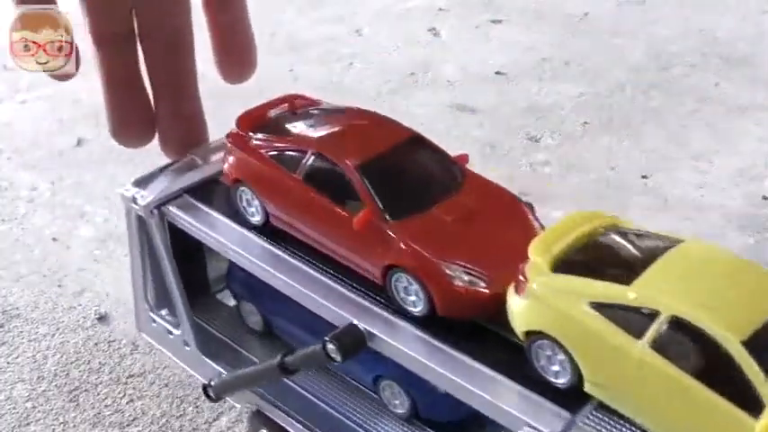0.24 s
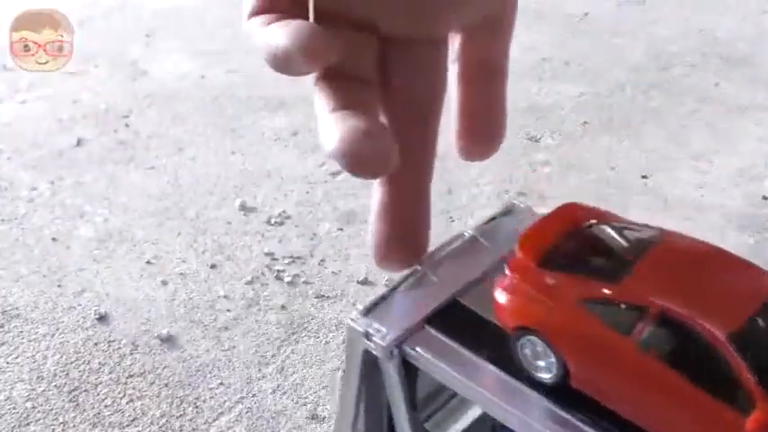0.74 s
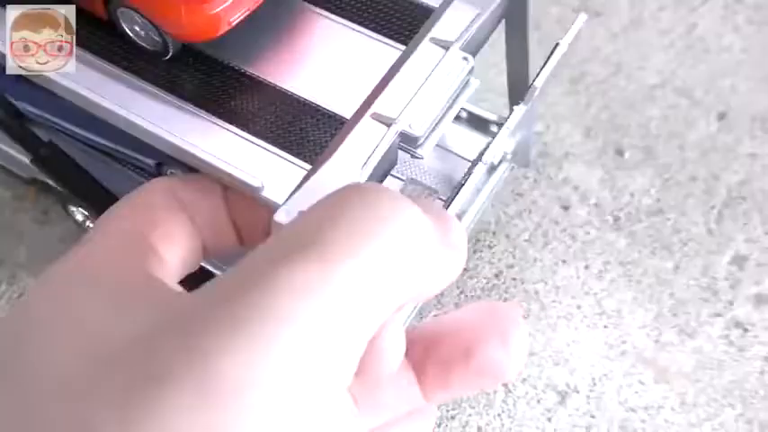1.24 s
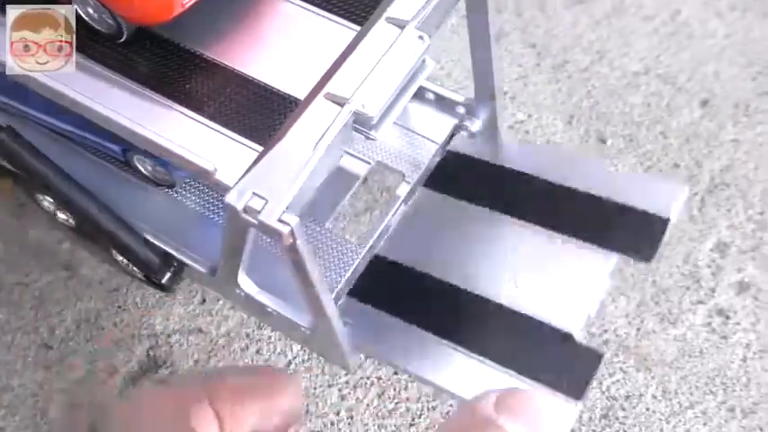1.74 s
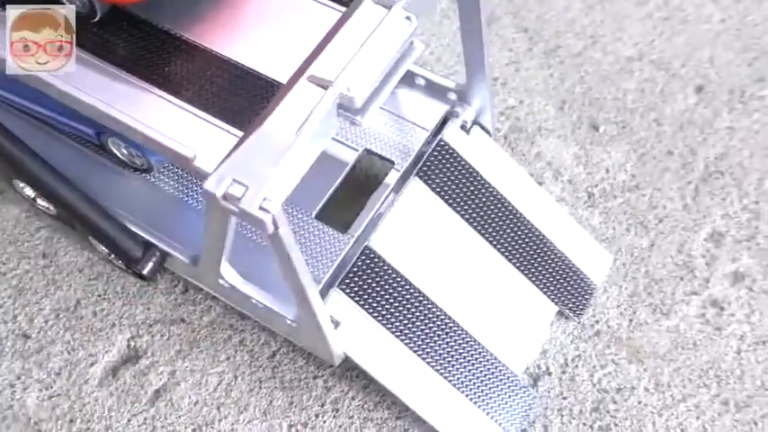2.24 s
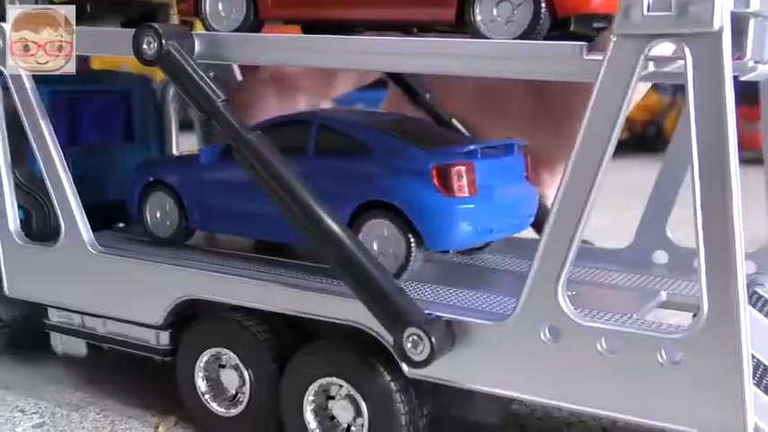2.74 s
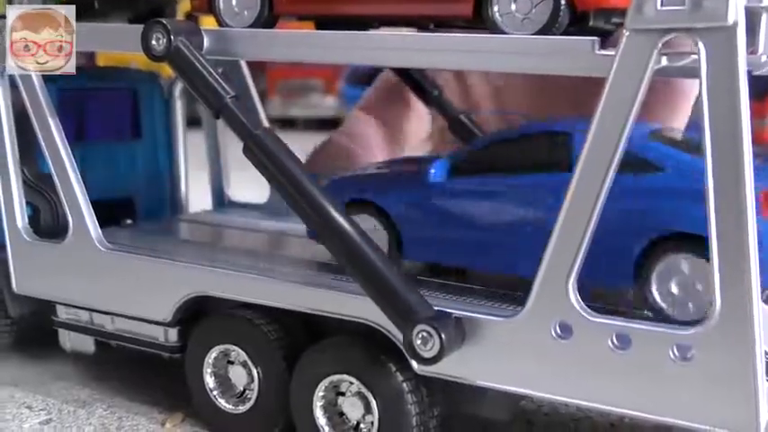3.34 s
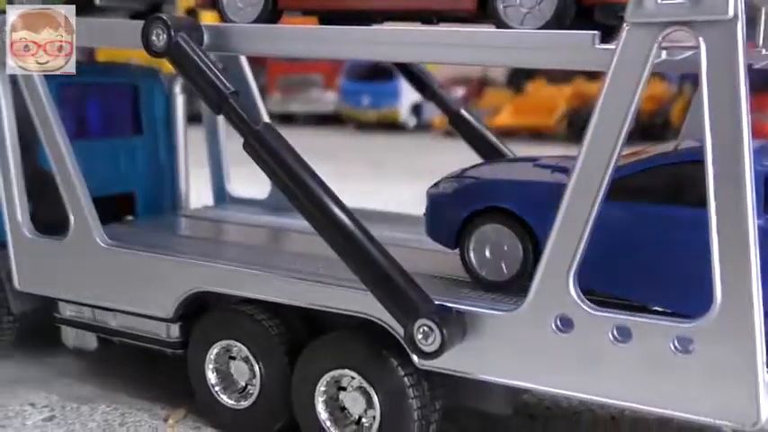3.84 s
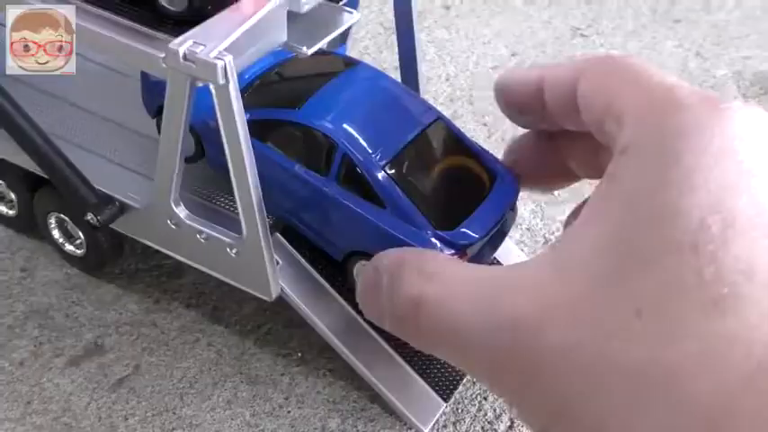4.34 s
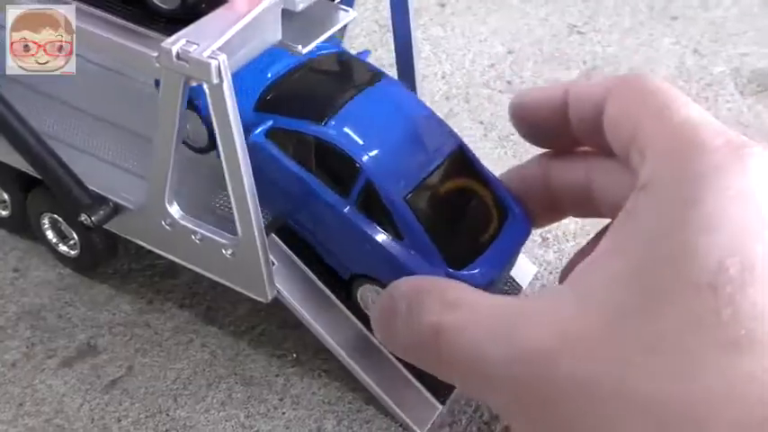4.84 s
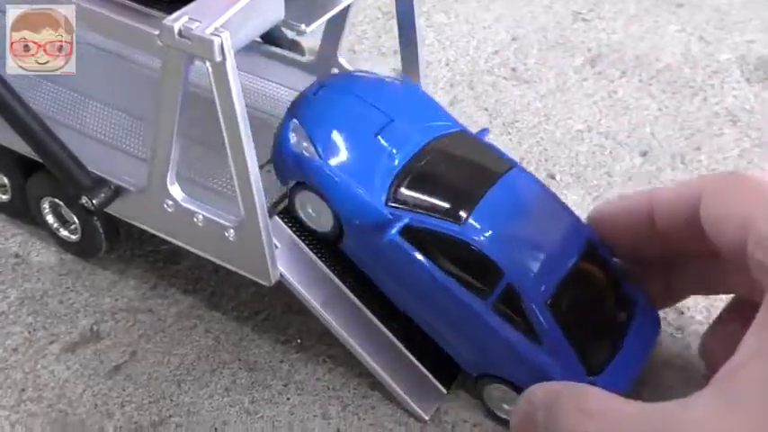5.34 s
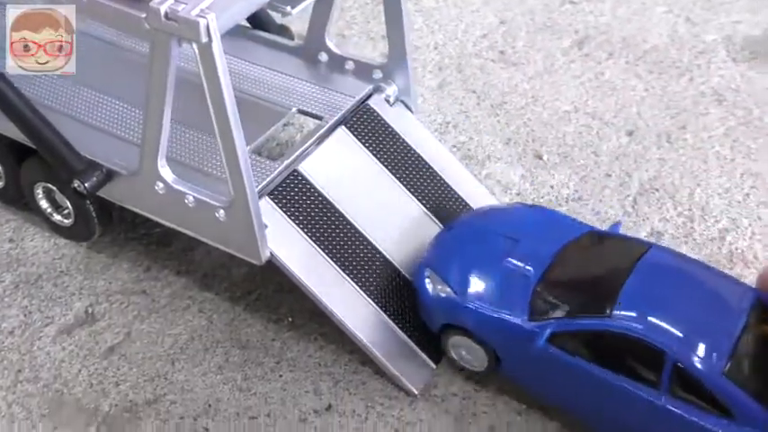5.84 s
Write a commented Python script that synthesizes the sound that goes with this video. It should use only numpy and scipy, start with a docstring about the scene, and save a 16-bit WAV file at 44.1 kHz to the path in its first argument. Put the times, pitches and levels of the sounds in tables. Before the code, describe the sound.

Four abruptly joined close shots of plastic toys on concrete: steady hollow grinding of wheels on grit; a hard unlatching snap, then a ramp dropping with a bright clack and shrinking bounces; a car whirring with dry rapid ticks along a hollow deck, knocking; finally slower ticks, bumps and gritty rolling down the ramp. Faint hiss and short room reflections.

```python
"""Plastic toy vehicles on gritty concrete, close to a small stereo microphone, in four joined shots.
A transporter rolls off; its ramp is unlatched, drops and bounces; a car is pushed along the deck and down the ramp.
Random grit grains ring hollow-shell resonances and crackle; short noise bursts make knocks, bounces and pawl ticks.
Decaying noise makes a small hard room; shaped noise and a narrow band make faint hiss and hum."""
import sys
import numpy as np
from scipy import signal
from scipy.fft import rfft, irfft
from scipy.io import wavfile
from scipy.ndimage import uniform_filter1d

SR = 44100
rng = np.random.default_rng(int(sys.argv[2]) if len(sys.argv) > 2 else 0)


def invert_db(level):
    """Linear amplitude ratio for a level in decibels (20 dB per decade), elementwise."""
    return 10 ** (np.asarray(level, dtype=float) / 20)


def to_wav(s):
    """Save 16-bit WAV."""
    ch = np.atleast_2d(s).T  # columns
    pcm = np.round(np.clip(ch, -1, 1) * 32767)  # PCM
    wavfile.write(sys.argv[1], SR, pcm.astype(np.int16))


N = 268569
TIME = np.arange(N) / SR
LEFT_RIGHT = np.array([[1], [-1]])


def unit(x):
    """Scale to rms 1."""
    return x / np.sqrt(np.mean(x ** 2))


def ring(x, hz, width_hz):
    """One resonance, gain 1 at its centre."""
    return signal.lfilter(*signal.iirpeak(hz, hz / width_hz, SR), x)


def mode_rings(x, modes):
    """Each resonance of a set, neighbours in opposite phase so the valleys stay filled."""
    return np.array([(-1) ** k * invert_db(db) * ring(x, hz, width_hz) for k, (hz, width_hz, db) in enumerate(modes)])


def shell(x, modes):
    """A set of resonances, summed."""
    return mode_rings(x, modes).sum(axis=0)


def steep(x, hz, kind):
    """Fourth-order high- or low-pass."""
    return signal.sosfilt(signal.butter(4, hz, kind, fs=SR, output="sos"), x)


def wander(cutoff_hz):
    """Slow random drift, rms 1."""
    return unit(signal.sosfilt(signal.butter(2, cutoff_hz, fs=SR, output="sos"), rng.standard_normal(N)))


def contact(noise, decay_ms, rise_ms=0.27):
    """A burst of tiny collisions that swells quickly and dies away."""
    t_ms = np.arange(noise.shape[-1]) * 1000 / SR
    return noise * (1 - np.exp(-t_ms / rise_ms)) * np.exp(-t_ms / decay_ms)


def between(table):
    """A level curve as gain, silent outside its span."""
    s, db = np.transpose(table)
    return invert_db(np.interp(TIME, s, db)) * (TIME >= s[0]) * (TIME <= s[-1])


# shot starts: t/s
CUTS_S = [0, 1.09, 2.33, 4.425]


def shot_end(s):
    """The next cut after a moment."""
    return min(cut for cut in CUTS_S + [np.inf] if cut > s)


def grit(grains_per_s, spread_db, decay_ms):
    """Grains crushed at random moments, few large and many small, each a short scrape."""
    struck = rng.random(N) < grains_per_s / SR
    sizes = struck * invert_db(spread_db * np.minimum(rng.exponential(size=N), 3))
    scrape = signal.lfilter([1], [1, -np.exp(-1000 / (decay_ms * SR))], sizes)
    return unit(scrape * rng.standard_normal(N))


# treble resonances of crushed grit: f/Hz, width/Hz, gain/dB
GRIT_MODES = [(4940, 1530, 9.4), (7050, 11500, 1.8), (9700, 2070, 5.33), (12160, 760, 2.5),
              (12500, 2500, 2.3)]
SHIFT_RMS_DB, SHIFT_CUTOFF_HZ = 1.2, 20


def rolling(body_gain, fine_gain, modes, grains_per_s, spread_db, decay_ms):
    """The same grains shake the shell, their power passing from panel to panel, and crackle in the treble."""
    grains = grit(grains_per_s, spread_db, decay_ms)
    rings = mode_rings(grains, modes)
    power = np.mean(rings ** 2, axis=1)
    shares = invert_db(SHIFT_RMS_DB * np.array([wander(SHIFT_CUTOFF_HZ) for _ in modes]))
    panels = np.sum(shares * rings, axis=0) / np.sqrt(power @ shares ** 2)  # steady total power
    body = unit(steep(panels, 290, "high"))
    fine = unit(steep(shell(grains, GRIT_MODES), 6300, "high"))
    return body * body_gain + fine * fine_gain


# transporter wheels on grit: t/s, shell level/dB
TRUCK_ROLL = [(0, -27), (.07, -35.5), (.4, -33.5), (.42, -29.5), (.55, -34), (.955, -32), (.97, -31.5),
              (1.09, -30)]
# hollow transporter shell: f/Hz, width/Hz, gain/dB
TRUCK_SHELL = [(303, 18, -9), (503, 200, -12.5), (859, 63, -0.5), (1107, 94, 3), (1640, 580, -2),
               (2490, 540, -2.5), (3380, 540, -3.5), (4460, 1960, -13)]
TRUCK_FINE_DB = -30.5  # crackle re shell


def transporter():
    """Wheels crush grit, which shakes the hollow transporter shell."""
    gain = between(TRUCK_ROLL)
    return rolling(gain, gain * invert_db(TRUCK_FINE_DB), TRUCK_SHELL, 2000, 1.0, 3.7)


# short drags of fingers, latch and wheels: start t/s, hold/s, shell level/dB, crackle re shell/dB
SCRAPES = [(1.091, 0.14, -42, -42), (1.28, 0.91, -60, -13.5), (1.89, 0.079, -48, -29),
           (2.854, 0.015, -33.5, -23), (3.2, 0.023, -32.5, -23), (3.403, 0.023, -37, -22),
           (3.613, .17, -32, -18.5), (3.779, 0.076, -43, -39), (3.909, 0.13, -59, -2.5),
           (4.228, 0.02, -44, -22), (4.25, 0.076, -33.5, -16.5), (4.36, .095, -43, -37)]
SCRAPE_ATTACK_S, SCRAPE_RELEASE_DB_PER_S = 0.0022, 311


def scrape_powers():
    """Shell and crackle powers of the drags: quick onset, hold, then a fade linear in dB."""
    body, fine = np.zeros(N), np.zeros(N)
    for s, hold_s, db, fine_db in SCRAPES:
        fade_db = SCRAPE_RELEASE_DB_PER_S * np.maximum(TIME - s - hold_s, 0)
        attack = np.clip((TIME - s) / SCRAPE_ATTACK_S, 0, 1)
        gain = attack * invert_db(db - fade_db) * (TIME < shot_end(s))
        body += gain ** 2
        fine += (gain * invert_db(fine_db)) ** 2
    return body, fine


# gear position on the deck, also ticked by pawl(): t/s, teeth passed
DECK_GEAR = [(2.627, 0), (2.689, 3), (2.745, 5), (2.823, 6), (2.87, 7), (2.919, 9), (2.951, 11),
             (2.973, 13), (3.014, 18), (3.106, 27), (3.172, 31), (3.251, 40), (3.283, 43), (3.356, 48),
             (3.416, 54), (3.463, 60), (3.522, 66), (3.616, 74)]
# car let down the ramp and onto the ground: t/s, shell level/dB
RAMP_ROLL = [(4.874, -46.5), (5.05, -45.5), (5.15, -38), (5.26, -37.5), (5.39, -45), (5.415, -28),
             (5.45, -43), (5.63, -41), (5.8, -35), (6.09, -32.5)]
DECK_DB, DECK_TEETH_PER_S, DB_PER_DOUBLING = -36.5, 105, 11  # level at this speed, louder when faster
SPEED_SMOOTH_S = 0.0068
CAR_FINE_DB = -19  # ramp-roll crackle re shell


def car_levels():
    """Shell and crackle gains: deck roll from gear speed, ramp roll and scrapes, summed as powers."""
    teeth_per_s = np.gradient(np.interp(TIME, *np.transpose(DECK_GEAR))) * SR
    teeth_per_s = uniform_filter1d(teeth_per_s, int(SPEED_SMOOTH_S * SR)).clip(1e-3)
    deck = invert_db(DECK_DB + DB_PER_DOUBLING * np.log2(teeth_per_s / DECK_TEETH_PER_S))
    ramp = between(RAMP_ROLL)
    scrape_body, scrape_fine = scrape_powers()
    body = deck ** 2 + ramp ** 2 + scrape_body
    fine = (ramp * invert_db(CAR_FINE_DB)) ** 2 + scrape_fine
    return np.sqrt(body), np.sqrt(fine)


# car standing on the hollow deck: f/Hz, width/Hz, gain/dB
DECK_SHELL = [(492, 410, -6.5), (1200, 170, 9), (1760, 370, 3.5), (2345, 200, 5.5), (2800, 460, 2),
              (4530, 1000, -4)]
# hollow car shell, also struck in knocks(): f/Hz, width/Hz, gain/dB
CAR_SHELL = [(280, 1000, -12), (1200, 156, 11.5), (1697, 385, 7), (1974, 530, 8.5), (2800, 1480, 0.5),
             (4180, 2080, -4.5)]


def car():
    """Rolls and scrapes shake car and deck together in the third shot, the car shell in the others."""
    body, fine = car_levels()
    on_deck = (TIME >= CUTS_S[2]) & (TIME < CUTS_S[3])
    deck = rolling(body * on_deck, fine * on_deck, DECK_SHELL, 1400, 3.3, 3.0)
    return deck + rolling(body * ~on_deck, fine * ~on_deck, CAR_SHELL, 1100, 3.2, 3.1)


# thin ramp plate: f/Hz, width/Hz, gain/dB
RAMP_MODES = [(1316, 300, 5), (1765, 164, 7), (2250, 450, 5), (3550, 1400, -4), (5240, 600, 1),
              (7260, 4700, -10), (11100, 810, -0.5), (11640, 240, -2), (13700, 1760, -3)]
DROP_S, FIRST_FLIGHT_S, REBOUND, BOUNCES = 1.9325, 0.119, 0.66, 4
DROP_DB, BOUNCE_LOSS_DB = -8.5, 0.85  # loss grows with the square of the bounce number
FIRST_CLACK_MS, CLATTER_DB = 3.3, -14


def bounces():
    """The ramp plate clacks on concrete and clatters on, each flight shorter and each blow weaker."""
    out, size = np.zeros(N), 4096
    flights_s = FIRST_FLIGHT_S * REBOUND ** np.arange(BOUNCES)
    blows_s = DROP_S + np.r_[0, np.cumsum(flights_s)]
    noise = rng.standard_normal((BOUNCES + 1, 2, size))
    for k, (s, (hit, clatter)) in enumerate(zip(blows_s, noise)):
        blow = contact(hit, FIRST_CLACK_MS * 0.94 ** k, 0.3) + invert_db(CLATTER_DB) * contact(clatter, 21.6, 1.1)
        clack = shell(blow, RAMP_MODES)
        i = int(s * SR)
        out[i:i + size] += invert_db(DROP_DB - k ** 2 * BOUNCE_LOSS_DB) * clack / np.abs(clack).max()
    return out


# knocks and latches: t/s, body peak level/dB, own ring f/Hz, crack re body/dB, decay/ms
KNOCKS = [(0.02, -17, 1200, -14, 2), (.044, -21, 1220, -15, 3.9), (.208, -21, 1100, -27.5, 3.3),
          (.243, -20, 1080, -12, 5.1), (1.108, -24, 3680, -31, 4.7), (1.14, -11, 1470, 0.5, 1.7),
          (1.213, -24.5, 2010, -30, 4), (1.416, -33, 2260, -7, 3.2), (1.731, -34.5, 1830, -40, 2.9),
          (2.556, -17.5, 2460, -25, 6.8), (2.561, -19, 1310, 1.5, 3.7), (2.691, -18.5, 2500, -29, 8.1),
          (2.881, -15.5, 2580, -2, 3.1), (3.014, -17, 2500, -17, 6.5), (3.527, -18.5, 2880, -6.5, 9.3),
          (3.647, -13, 2800, -3.5, 9.1), (3.697, -21.5, 1410, -2, 9.2), (3.721, -18, 1470, -2, 3.7),
          (4.407, -23, 1340, -7.5, 5.1), (4.984, -25, 1070, -15, 8.2), (5.219, -15, 2800, -7, 7.8),
          (5.231, -19, 1390, -35, 7), (5.396, -24, 1440, -23, 5.8), (5.442, -17.5, 2830, -7, 2.5),
          (5.732, -19, 1540, -11, 2.8), (5.783, -23, 1240, -6.5, 3.6), (5.923, -19, 1390, -13, 2.8),
          (5.95, -23, 1380, -5, 4.9), (6.003, -19.5, 1520, -9, 2.6), (6.036, -18, 1200, -2, 4)]
# fingertips nudging the plastic: t/s, body peak level/dB, own ring f/Hz
TOUCHES = [(1.365, -48, 2500), (1.381, -46, 1410), (1.478, -41, 1930), (1.875, -41.5, 1400),
           (1.892, -36, 1480), (4.55, -48, 2500), (4.704, -45.5, 1020), (4.946, -36, 1090),
           (5.112, -30, 1990)]
TOUCH_CRACK_DB, TOUCH_DECAY_MS = -13, 4.5
RISE_PER_DECAY, CHATTER_DB = 0.26, -11


def knocks():
    """Each blow rattles the shell and rings the part that was struck; a bright crack rides on top."""
    size = 4096
    out = np.zeros(N + size)
    blows = KNOCKS + [(*touch, TOUCH_CRACK_DB, TOUCH_DECAY_MS) for touch in TOUCHES]
    noise = rng.standard_normal((len(blows), 2, size))
    for (s, db, hz, crack_db, decay_ms), (low, high) in zip(blows, noise):
        rise_ms = RISE_PER_DECAY * decay_ms
        chatter = contact(high, 3.24 * decay_ms, rise_ms)  # loose parts chatter on after the blow
        blow = contact(low, decay_ms, rise_ms) + invert_db(CHATTER_DB) * chatter
        body = steep(shell(blow, CAR_SHELL) + invert_db(9.5) * ring(blow, hz, hz / 4), 373, "high")
        crack = steep(shell(contact(high, 1.01 * decay_ms, rise_ms), GRIT_MODES), 5400, "high")
        knock = body / np.abs(body).max() + invert_db(crack_db) * crack / np.abs(crack).max()
        heard = s + TIME[:size] < shot_end(s)  # silent past the end of its shot
        i = int(s * SR)
        out[i:i + size] += heard * invert_db(db) * knock
    return out[:N]


# low push of the two hardest blows: t/s, peak level/dB
THUDS = [(1.1407, -25.5), (1.935, -31.5)]


def thuds():
    """Each push is one smooth Gaussian pressure pulse."""
    return sum(invert_db(db) * np.exp(-((TIME - s) / 0.00051) ** 2) for s, db in THUDS)


# gear position, first nudge: t/s, teeth passed
START_GEAR = [(4.876, 0), (4.938, 2)]
# gear position on the ramp: t/s, teeth passed
RAMP_GEAR = [(5.298, 0), (5.388, 7), (5.434, 11), (5.481, 15), (5.524, 18), (5.602, 25), (5.675, 30)]
# pawl as heard: t/s, mean level/dB, mean housing f/Hz, housing re level/dB
PAWL = [(2.62, -53, 6000, -9), (2.648, -24, 5800, -5), (3.3, -25.5, 5080, -6), (3.62, -30, 4770, -3),
        (4.9, -37, 8700, -8), (5.29, -27, 5600, -13), (5.58, -27, 6300, -11.5), (5.68, -49, 5200, -11)]
# pawl snap: f/Hz, width/Hz, gain/dB
PAWL_MODES = [(2500, 530, 12), (4560, 810, 11.5), (9550, 2500, 5.5), (11500, 600, 8), (13200, 2300, 3)]
SNAP_DB, SNAP_MS, HOUSING_MS = -4, 3.0, 0.8
TICK_SPREAD_DB, RING_SPREAD = 1, 0.03


def pawl():
    """A springy pawl drops off every tooth: a dry snap, and the housing rings for a few milliseconds."""
    out, size = np.zeros(N), 1024
    s, level_db, ring_hz, ring_db = np.transpose(PAWL)
    for gear in DECK_GEAR, START_GEAR, RAMP_GEAR:
        when_s, teeth = np.transpose(gear)
        for t in np.interp(np.arange(teeth[-1] + 1), teeth, when_s):  # one tick per whole tooth
            snap = shell(contact(rng.standard_normal(size), SNAP_MS), PAWL_MODES)
            hz = np.interp(t, s, ring_hz) * (1 + RING_SPREAD * rng.standard_normal())
            housing = contact(np.sin(2 * np.pi * hz * TIME[:size]), HOUSING_MS)
            tick = invert_db(np.interp(t, s, ring_db)) * housing / housing.max()
            tick += invert_db(SNAP_DB) * snap / np.abs(snap).max()
            db = np.interp(t, s, level_db) + TICK_SPREAD_DB * rng.standard_normal()
            i = int((t - 0.001) * SR)  # onset 1 ms ahead, so the swell meets the tooth
            out[i:i + size] += invert_db(db) * tick
    return out


ROOM_T60_S, ROOM_DB, ROOM_HIGHPASS_HZ = 0.26, -11, 153
WIDTH_DB, WIDTH_LOWPASS_HZ = -1.7, 5140


def room_tails(count):
    """Decaying noise as stereo reflections of a small hard room, one tail per shot."""
    t = np.arange(int(0.6 * SR)) / SR
    noise = steep(rng.standard_normal((2, count, 1, len(t))), ROOM_HIGHPASS_HZ, "high")
    alike, unlike = noise * invert_db(-60 * t / ROOM_T60_S) * (t > 0.003)
    # the two ports lie close together, so most of each reflection is the same in both
    tails = alike + invert_db(WIDTH_DB) * steep(unlike, WIDTH_LOWPASS_HZ, "low") * LEFT_RIGHT
    return tails * invert_db(ROOM_DB) / np.sqrt(np.sum(alike ** 2, axis=-1, keepdims=True))


# spectrum shape: f/Hz, relative density level/dB
BACKGROUND = [(60, -16), (130, -4), (250, -4.5), (420, -10), (620, -18), (1100, -12), (2200, -15),
              (4000, -25.5), (7000, -31), (10500, -29.5), (16000, -29)]
# hum band: f/Hz, width/Hz, rms level/dB
HUM = [(199, 4.2, -67.5)]


def background():
    """Hiss and distant rumble, partly alike left and right, and a narrow wavering hum band."""
    hz, db = np.transpose(BACKGROUND)
    gain = invert_db(np.interp(np.log(np.arange(N // 2 + 1) * SR / N + 1), np.log(hz), db))
    mid, side = (unit(irfft(rfft(rng.standard_normal(N)) * gain, N)) for _ in range(2))
    difference = invert_db(-10.5) * side + invert_db(-11.5) * steep(side, 550, "low")
    hum = sum(invert_db(db) * unit(ring(rng.standard_normal(N), hz, width_hz)) for hz, width_hz, db in HUM)
    return mid + difference * LEFT_RIGHT, hum


# each shot: left minus right/dB, hiss mid rms level/dB
SHOTS = [(-0.4, -56), (2, -62.5), (0.5, -57.5), (0.5, -58)]


def scene():
    """Every shot has its own pan, hiss level and room tail, cut off where the next begins."""
    dry = transporter() + car() + bounces() + knocks() + thuds() + pawl()
    tails = room_tails(len(SHOTS))
    hiss, hum = background()
    out, edges = np.zeros((2, N)), [int(s * SR) for s in CUTS_S] + [N]
    for a, b, tail, (pan_db, hiss_db) in zip(edges, edges[1:], tails, SHOTS):
        direct = dry[a:b] * invert_db(pan_db * LEFT_RIGHT / 2)
        room = signal.fftconvolve(dry[None, a:b], tail, axes=1)[:, :b - a]
        out[:, a:b] = direct + room + invert_db(hiss_db) * hiss[:, a:b]
    return out + hum


def low_pass(x):
    """Removes everything above the highest recorded frequency."""
    return signal.sosfilt(signal.butter(12, 16990, fs=SR, output="sos"), x)


BASS_HZ, BASS_LEAN_DB, TOP_HZ = 450, -14.5, 15800


def record(dry):
    """The bass leans to the right; the top of the band is cut."""
    bass = signal.lfilter(*signal.butter(1, BASS_HZ, fs=SR), dry.mean(axis=0))
    leaning = dry - invert_db(BASS_LEAN_DB) * bass * LEFT_RIGHT
    mix = signal.sosfilt(signal.ellip(6, 0.3, 30, TOP_HZ, fs=SR, output="sos"), leaning)
    return low_pass(mix)


dry = scene()
out = record(dry)
to_wav(out)
```